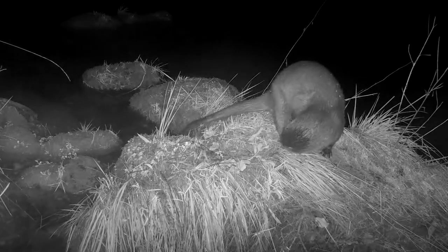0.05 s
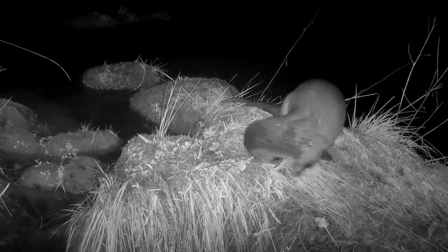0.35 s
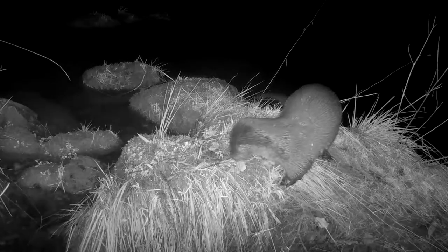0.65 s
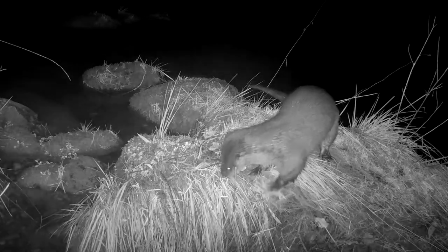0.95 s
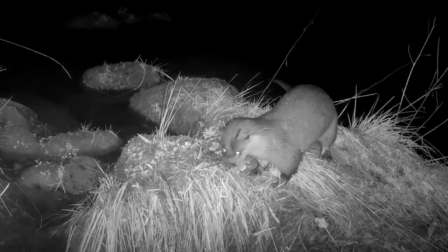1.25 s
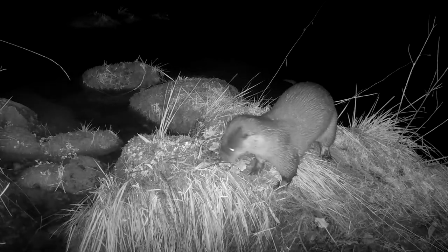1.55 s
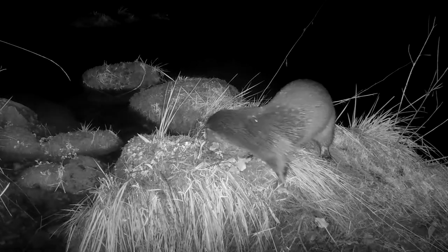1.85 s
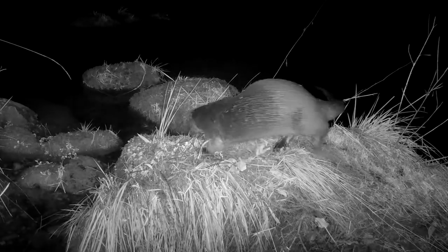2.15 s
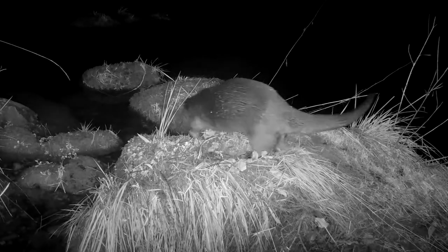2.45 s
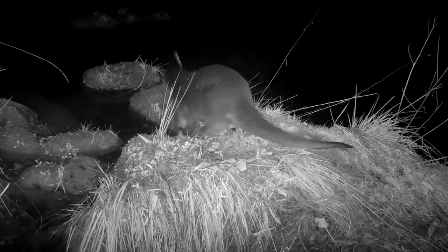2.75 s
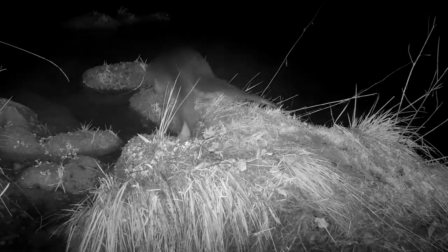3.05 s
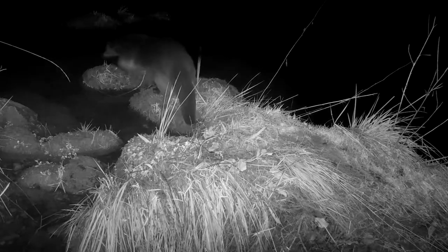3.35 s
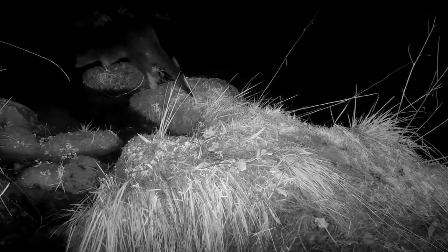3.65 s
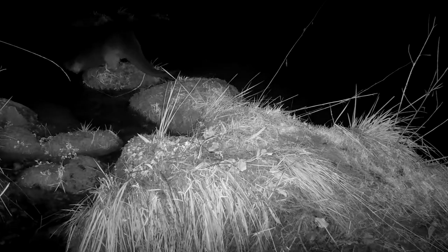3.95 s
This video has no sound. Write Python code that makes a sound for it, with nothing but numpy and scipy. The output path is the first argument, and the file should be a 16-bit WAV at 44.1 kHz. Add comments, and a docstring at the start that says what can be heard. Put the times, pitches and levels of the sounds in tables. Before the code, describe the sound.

A river flows and bubbles evenly while an otter faintly rustles dry grass.

```python
"""An otter by a night river

A shallow river rushes steadily over stones; small bubbles ring in it and now and then a larger one
gurgles. An otter shifts about on a tussock of dry grass, rustling it and snapping a few stalks, then
leaves over the rocks. The wildlife camera hears little above 4.5 kHz and adds a faint hiss and whine."""
import sys
import numpy as np
from scipy import signal
from scipy.fft import rfft, irfft, next_fast_len
from scipy.io import wavfile
from scipy.ndimage import uniform_filter1d, map_coordinates

SR = 44100
rng = np.random.default_rng(int(sys.argv[2]) if len(sys.argv) > 2 else 0)


def wrap_up_sound(samples):
    """Save the sound to the file named by the first command line argument, as 16-bit audio."""
    columns = np.atleast_2d(samples).T
    # keep every value between -1 and 1, then stretch to whole-number steps
    tamed = np.clip(columns, -1, 1)
    steps = np.round(tamed * 32767).astype(np.int16)
    wavfile.write(sys.argv[1], SR, steps)


N = 176400


def amp(db):
    """Turn decibels into a number to multiply by."""
    return 10 ** (np.asarray(db) / 20)


def unit(x):
    """Scale a signal so its average strength (rms) is 1."""
    return x / np.sqrt(np.mean(x ** 2) + 1e-20)


def clock():
    """The time of every sample, in seconds."""
    return np.arange(N) / SR


def wobble(per_s):
    """A smooth curve through per_s random values a second."""
    return map_coordinates(rng.standard_normal(int(N * per_s / SR) + 4), [clock() * per_s])


def filtered(x, response):
    """Turn each frequency up or down by the gain response(hz)."""
    size = next_fast_len(N + 8192)
    return irfft(rfft(x, size) * response(np.fft.rfftfreq(size, 1 / SR)), size)[:N]


def coloured(x, points):
    """Shape the tone along a curve of (pitch_hz, gain_db) points."""
    pitch_hz, gain_db = np.transpose(points)
    return filtered(x, lambda hz: amp(np.interp(np.log(hz + 1), np.log(pitch_hz), gain_db)))


def placed(starts_s, sounds):
    """Add up short sounds, one per row, each at its start time."""
    at = (np.asarray(starts_s)[:, None] * SR).astype(int) + np.arange(sounds.shape[1])
    return np.bincount(np.maximum(at, 0).ravel(), sounds.ravel(), N)[:N]


def ringing(t, hz, fade_s, attack_s, rise):
    """One bubble: a tone that starts softly, then rises in pitch as it fades by 60 dB in fade_s."""
    tone = np.sin(2 * np.pi * hz * t * (1 + rise * t / fade_s / 2))
    return tone * amp(-60 * t / fade_s) * (1 - np.exp(-t / attack_s))


def electronics():
    """The camera hisses and whines; at every picture the whine's wave flips over with a tiny tick."""
    # tone of the hiss: pitch_hz, gain_db
    hiss_tone = [(100, 17), (5000, 4), (7200, 0), (9000, -2), (12600, -2.5), (13200, -17)]
    # tone of a tick: pitch_hz, gain_db
    tick_tone = [(4000, -12), (5300, 2), (6800, -7), (9000, -15), (11000, -18), (14000, -38)]
    flips_per_s, first_flip_s = 59.513, 0.0133
    whine_hz = 131 * flips_per_s
    t = clock() - first_flip_s
    sign = np.where(np.sin(np.pi * flips_per_s * t) < 0, -1., 1.)
    whine = np.sqrt(2) * np.sin(2 * np.pi * whine_hz * t) * sign
    whine = coloured(whine, [(7800, 0.5), (10000, -3)])
    ticks = coloured(np.diff(sign, prepend=sign[0]) / 2, tick_tone)
    hiss = unit(coloured(rng.standard_normal(N), hiss_tone))
    return amp(-77.5) * whine + amp(-57.5) * ticks + amp(-80.5) * hiss


def rush(patchy_db):
    """Countless far bubbles merge into a noise with shifting patches and tiny surges."""
    # tone of the rushing water: pitch_hz, gain_db
    rush_tone = [(25, -44), (50, -27), (95, -21.5), (150, -16), (200, -14), (300, -9), (380, -6),
                 (690, -5.5), (770, -3.5), (1050, -1.6), (1320, 0.14), (1850, -2.5), (2500, -6.5),
                 (3000, -7.5), (3550, -11), (4200, -10)]
    spectrum = signal.stft(rng.standard_normal(N), nperseg=512)[2]
    patches = uniform_filter1d(rng.standard_normal(spectrum.shape), 5, axis=0)  # smooth across pitch
    patches = uniform_filter1d(patches, 8, axis=1)  # and across time
    noise = signal.istft(spectrum * amp(patchy_db * unit(patches)), nperseg=512)[1][:N]
    level_db = -49 + 0.06 * wobble(per_s=22)
    return amp(level_db) * unit(coloured(noise, rush_tone))


def bubbles(per_s, middle_hz):
    """Nearer small bubbles ring at random; the low ones last longer."""
    count = int(per_s * N / SR)
    starts_s = rng.random(count) * N / SR
    quieter_db = np.minimum(-np.log(1 - rng.random((count, 1))), 4)
    hz = np.clip(middle_hz * np.exp(0.381 * rng.standard_normal((count, 1))), 300, 4500)
    t = np.arange(SR // 32) / SR
    rings = amp(-quieter_db) * ringing(t, hz, fade_s=30.6 / hz, attack_s=1 / hz, rise=0.22)
    return amp(-61.5) * unit(placed(starts_s, rings))


def gurgles():
    """Single larger bubbles stand out of the rush."""
    # one large bubble per row: start_s, pitch_hz, level_db, fade_s
    large_bubbles = [(.135, 445, -51, 0.084), (.331, 1080, -41, .07), (.34, 853, -43, .066),
                     (.350, 1195, -44, 0.08), (.415, 968, -48, .12), (0.445, 1072, -45, 0.11),
                     (.619, 972, -40, 0.075), (.634, 1144, -49, 0.056), (.816, 985, -43, 0.096),
                     (1.105, 410, -40.5, 0.11), (2.094, 1676, -42, 0.071), (2.445, 630, -51, .056),
                     (2.848, 1423, -41, 0.068), (3.118, 1163, -40.5, 0.076), (3.260, 430, -47, 0.044),
                     (3.627, 400, -48.5, 0.089), (3.962, 1370, -45, 0.15)]
    start_s, pitch_hz, level_db, fade_s = np.transpose(large_bubbles)[:, :, None]
    t = np.arange(SR // 6) / SR
    rings = amp(level_db) * ringing(t, pitch_hz, fade_s, attack_s=0.0074, rise=0.17)
    return placed(start_s[:, 0], rings)


def rustles():
    """Dry blades crackle in clumps each time the otter brushes them."""
    # strokes of the body through the grass: peak_s, half_width_s, level_db
    strokes = [(.325, 0.022, -63.5), (.39, .025, -66), (.635, 0.015, -68), (0.681, 0.011, -56),
               (.80, 0.041, -61), (0.849, 0.016, -58.5), (1.10, 0.019, -66), (1.17, 0.03, -63.5),
               (1.67, 0.01, -66), (1.75, 0.032, -64), (2.3, .1, -73), (3.76, 0.0052, -60)]
    # tone of dry grass: pitch_hz, gain_db
    grass_tone = [(800, -14), (2000, -3.5), (4300, 1), (5700, 9), (9000, 4), (12500, -7.5)]
    swells = sum(amp(level_db) * np.exp(-0.5 * ((clock() - peak_s) / half_width_s) ** 2)
                 for peak_s, half_width_s, level_db in strokes)
    noise = rng.standard_normal(N)
    crackle_db = 4.5 * (wobble(per_s=1200) + 0.68 * wobble(per_s=130))  # fine grains plus slower clumps
    return amp(10.5) * swells * unit(coloured(noise * amp(crackle_db), grass_tone))


def snaps(band_width):
    """Stalks snap and claws tick: each is a burst of noise around one pitch that dies away fast."""
    # one snap or tick per row: start_s, pitch_hz, level_db, fade_s
    cracks = [(.675, 5800, -41, .008), (.687, 11000, -44, .014), (.802, 11000, -46, .024),
              (.809, 10500, -45, .016), (.8345, 10000, -38, .01), (0.834, 4800, -41, 0.0072),
              (.844, 10000, -40, .01), (.845, 4300, -43, .03), (.966, 12000, -46, .024),
              (1.085, 11500, -41, .011), (1.095, 11000, -43, .007), (1.1025, 10500, -38, .005),
              (1.102, 4800, -39, 0.0065), (1.158, 10500, -39, .007), (1.162, 9500, -43, .008),
              (1.161, 5400, -41, .012), (1.168, 4400, -44, 0.0088), (1.186, 10500, -47, .012),
              (1.193, 10500, -38, .011), (1.389, 4270, -43, 0.018), (1.417, 3660, -42.5, .018),
              (1.5967, 2070, -33, .008), (1.665, 5500, -42, .014), (1.669, 9000, -47, .012),
              (1.759, 4200, -46, .024), (3.610, 4200, -40.5, 0.014), (3.757, 5500, -40, .012),
              (3.7595, 10500, -44, .012), (3.9603, 5500, -29.5, .008)]
    out = np.zeros(N)
    for start_s, pitch_hz, level_db, fade_s in cracks:
        age = clock() - start_s
        fade = amp(level_db - 60 * np.abs(age) / fade_s) * (age >= 0)
        band = lambda hz: 1 / (1 + ((hz / pitch_hz - pitch_hz / (hz + 1)) / (2 * band_width)) ** 2)
        crack = filtered(fade * rng.standard_normal(N), band)
        out += 0.5 * fade.std() * unit(crack)
    return out


def scene():
    """The river flows behind the otter's tussock."""
    # the river's fizz fades with distance: pitch_hz, gain_db
    distance_tone = [(4200, 1), (6000, -2.5), (8000, -7), (12000, -26)]
    water = rush(patchy_db=0.5) + bubbles(per_s=900, middle_hz=1404) + gurgles()
    river = coloured(water, distance_tone)
    return (river + rustles() + snaps(band_width=0.22))[None]


def record(dry):
    """The camera dulls the high sounds, adds its own noise and keeps nothing above top_hz."""
    # how well the camera hears high sounds: pitch_hz, gain_db
    camera_tone = [(4250, 1), (4600, -6), (5000, -15.5), (5500, -25), (6200, -26.5), (7300, -39),
                   (8500, -31), (10500, -21), (12500, -28), (14000, -39)]
    top_hz = 14300
    heard = coloured(dry[0], camera_tone) + electronics()
    return filtered(heard, lambda hz: hz < top_hz)[None]


dry = scene()
out = record(dry)
wrap_up_sound(out)
```